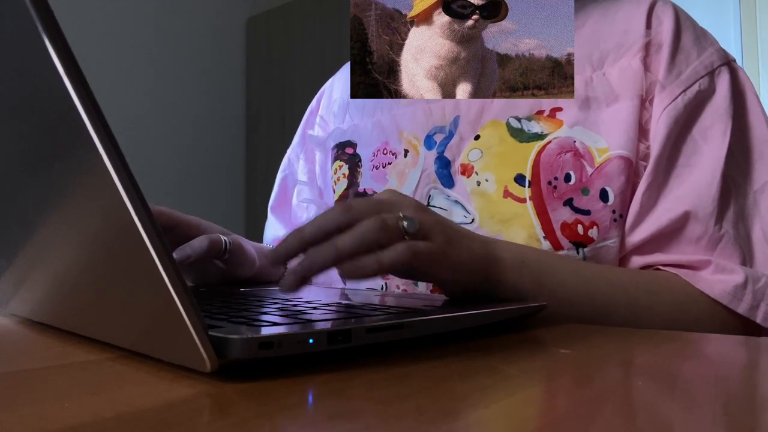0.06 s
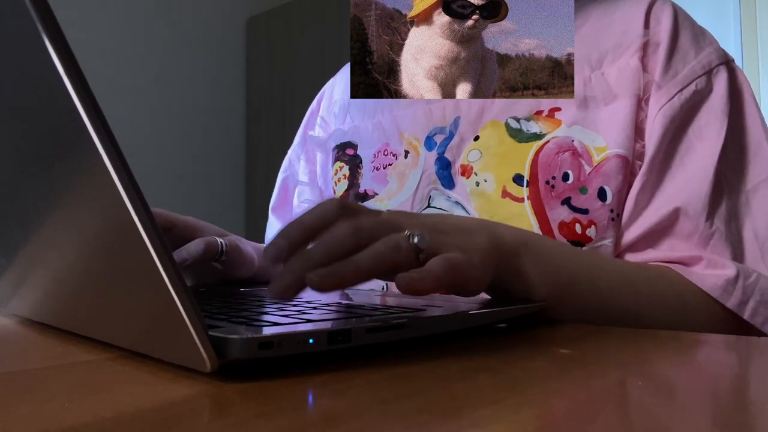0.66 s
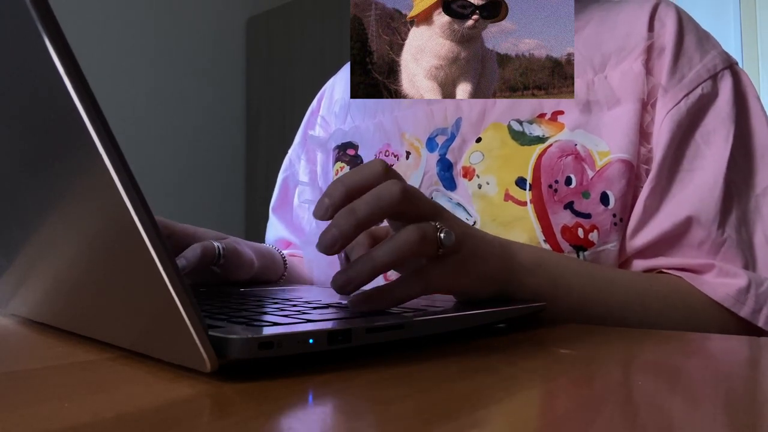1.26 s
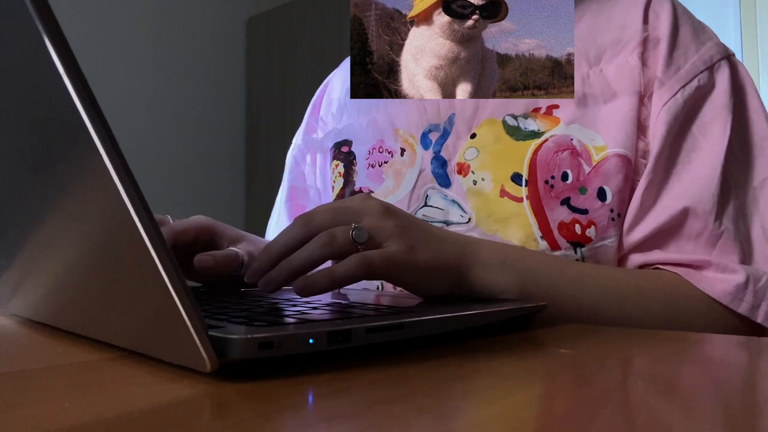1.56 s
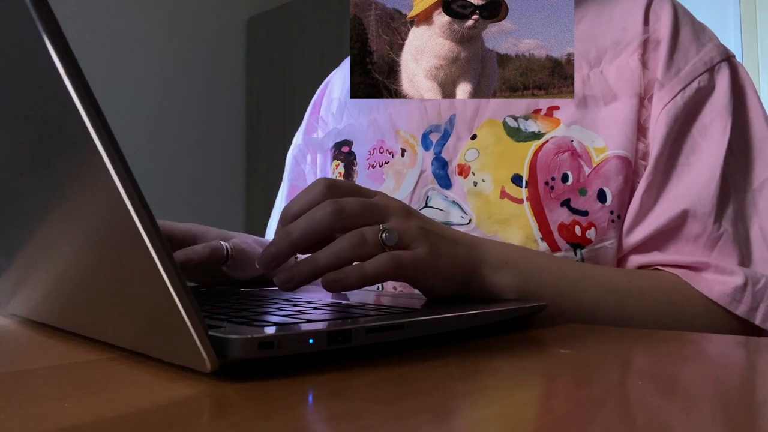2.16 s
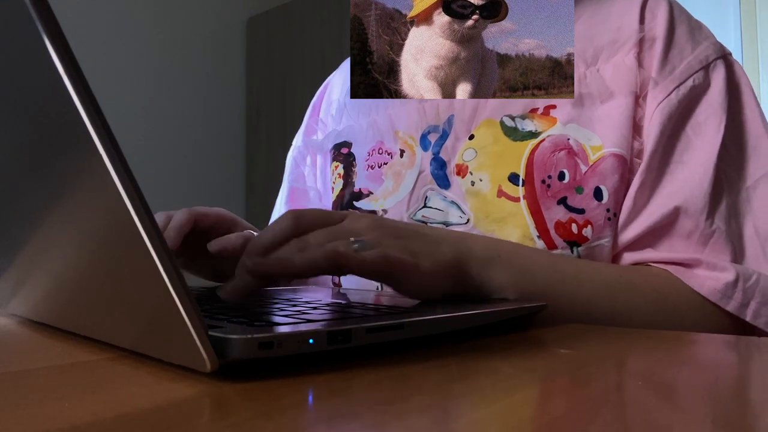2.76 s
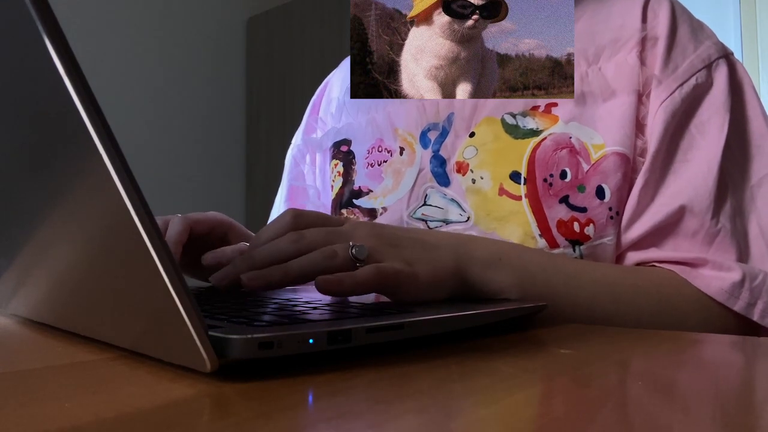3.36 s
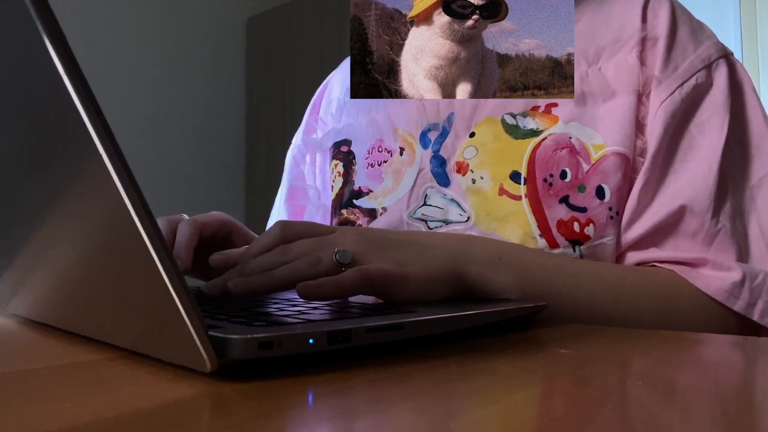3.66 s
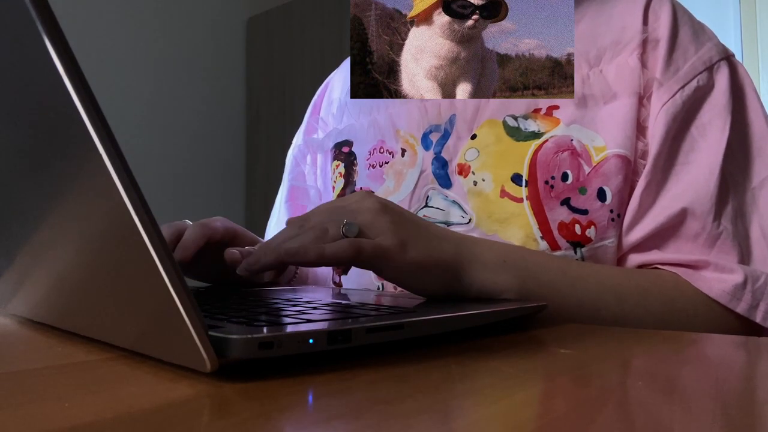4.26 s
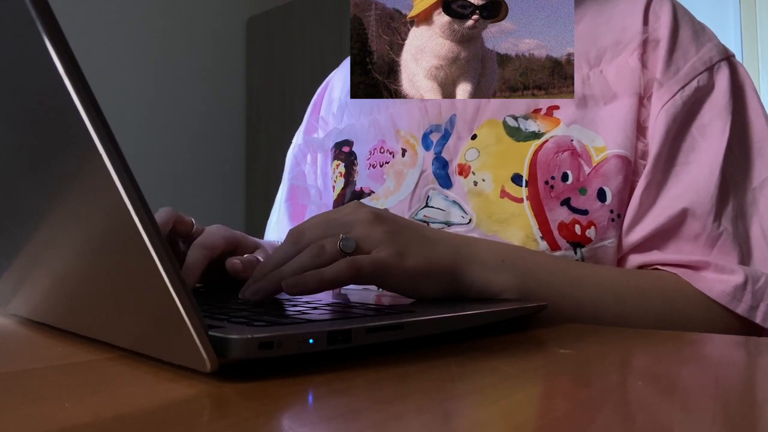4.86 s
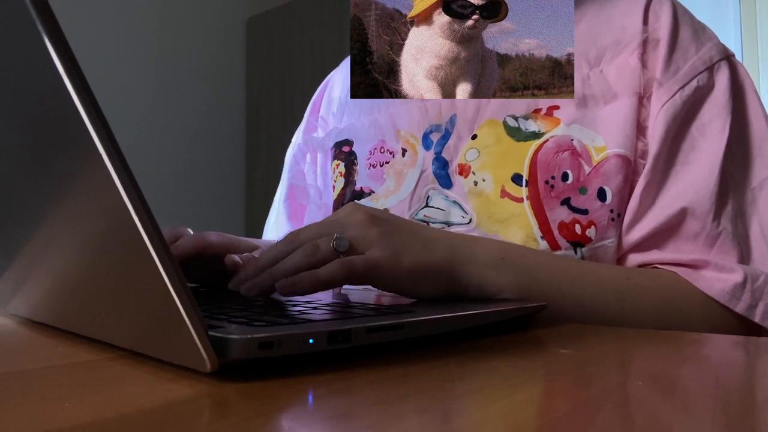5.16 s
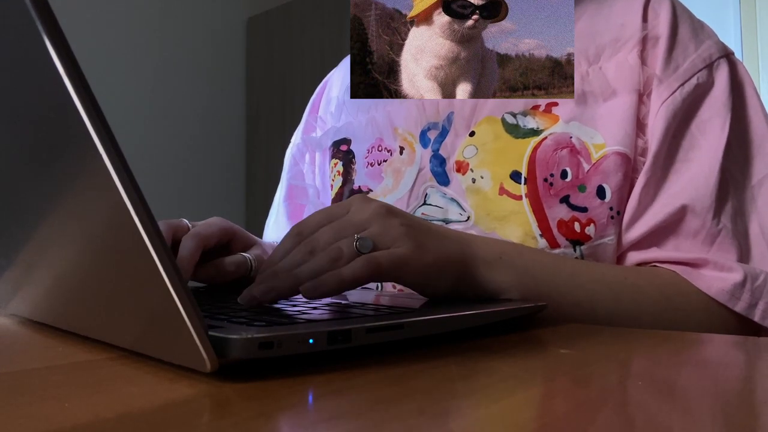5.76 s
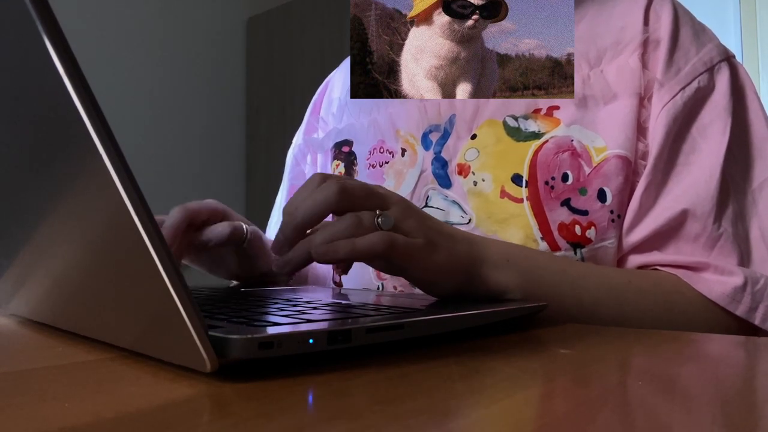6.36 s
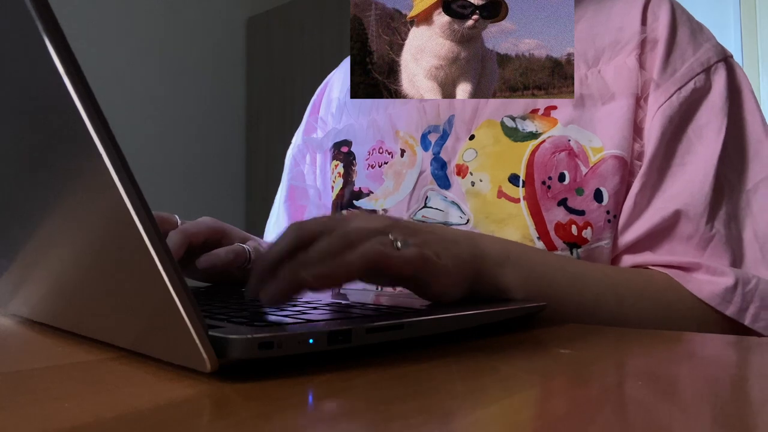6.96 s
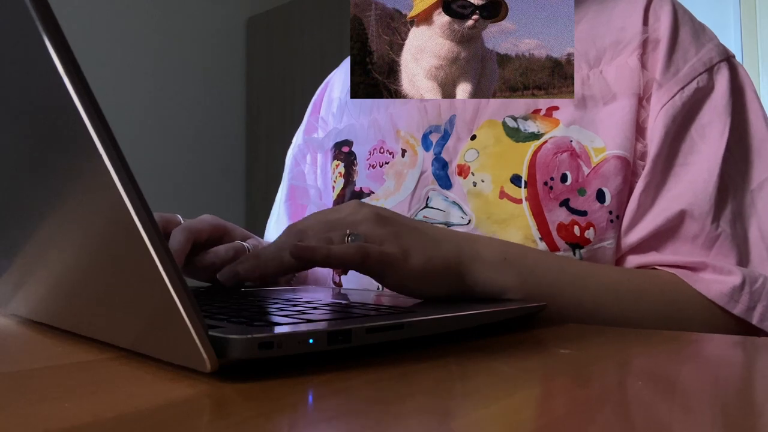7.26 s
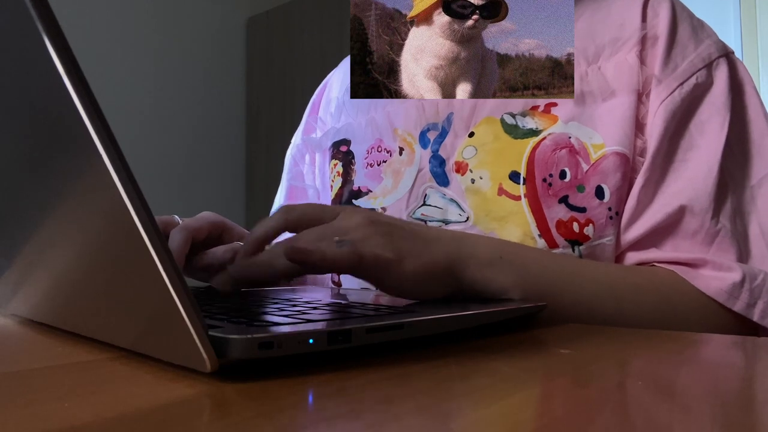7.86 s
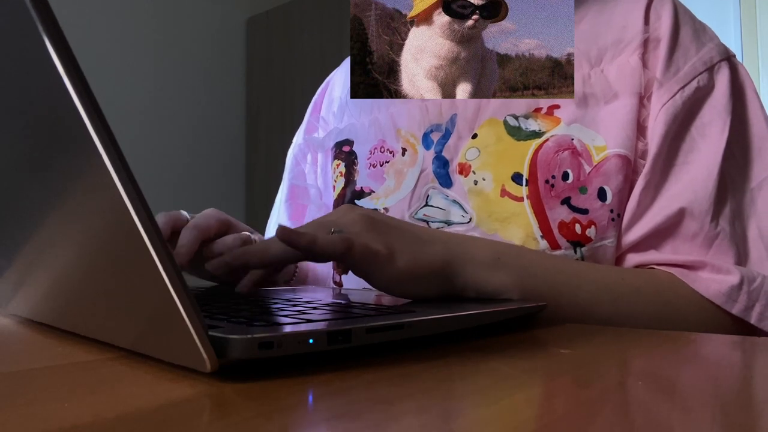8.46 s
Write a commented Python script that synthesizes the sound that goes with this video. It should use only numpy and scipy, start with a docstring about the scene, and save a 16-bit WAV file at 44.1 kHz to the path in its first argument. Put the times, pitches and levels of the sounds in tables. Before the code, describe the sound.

Someone types on a laptop standing on a wooden desk. A few scattered keystrokes come first, then quick, uneven flurries with brief pauses, growing busier toward the end. Each press is a crisp plastic click with a small knock from the case and a soft thump from the desk. Hands rub faintly on the palm rest. The sound is close, in a small, quiet room with a low hum.

```python
"""Someone types in short flurries on a laptop that stands on a wooden desk in a small, quiet room.
Every press is one chain: the nail clicks on the plastic cap, the key bottoms out and rings the case, and the desk swings under it.
Keys tick as they spring back, hands shift on the palm rest between words; a low hum and a faint whine lie behind."""
import sys
import numpy as np
from scipy import signal
from scipy.fft import rfft, irfft
from scipy.io import wavfile

SR = 44100
rng = np.random.default_rng(int(sys.argv[2]) if len(sys.argv) > 2 else 0)


def output_pcm(signal):
    """Save a mono or channel-first signal as 16-bit PCM at the path in sys.argv[1].

    Samples are clipped to [-1, 1] before scaling.
    """
    pcm = np.clip(np.atleast_2d(signal).T, -1, 1) * 32767
    wavfile.write(sys.argv[1], SR, np.round(pcm).astype(np.int16))


N = 374850

# modes of the laptop case: (Hz, dB, t60 s)
CASE = [(155.1, -3, 0.43), (232.5, 3, 0.32), (287.7, -4, 0.35), (345, 3, 0.071), (397.6, -5, 0.19), (425.4, -6, 0.31), (470, -2, 0.28), (510.7, 0, 0.12), (611, -6.5, 0.11), (702, -1.5, 0.15), (946, 0, 0.37), (1042, 14.5, 0.2), (1134, 11.5, 0.1), (1311, 7.5, 0.27), (1522, -6.5, 0.15), (1636, -10.5, 0.23), (2000, -31, 0.09), (2210, -30, 0.27)]
# palms rubbing on the case, deep under the heel of the hand and brighter in a fast slide: (start s, end s, dB, lower edge Hz, upper edge Hz)
SHIFTS = [(0, 0.128, -51.5, 108, 235), (1.12, 1.42, -60.5, 60, 170), (1.224, 1.42, -56, 168, 386), (1.332, 1.41, -50, 245, 337),
          (3.379, 3.676, -63.5, 122, 395), (4.897, 5.08, -63, 119, 388), (6.43, 6.56, -50, 134, 570), (6.51, 6.657, -49.5, 113, 202),
          (6.735, 6.84, -57.5, 151.9, 394), (7.059, 7.257, -55.5, 121, 247.9)]
# fingertips brushing over the caps: (start s, end s, dB)
BRUSHES = [(0.47, 0.618, -80.5), (0.743, 0.86, -80), (4.967, 5.053, -93), (5.121, 5.282, -75), (6.305, 6.475, -76.5), (6.467, 6.62, -88), (7.141, 7.23, -74), (7.587, 7.656, -72.5), (8.106, 8.23, -72)]
# still room air: (Hz, dB per Hz)
AIR = [(25, -40), (50, -11.5), (75, 0.5), (105, -1.5), (150, -2.5), (190, -10.5), (300, -12.5), (450, -17.5), (800, -26.5), (1300, -34.5), (2000, -39), (5000, -45.5), (13000, -48), (16000, -53.5)]
AIR_DB = -63
# steady hum and whine: (Hz, dB)
HUM = [(107.7, -72.5), (150.7, -77)]
WHINE = [(382, -94), (872, -89), (1077, -90.5), (1282, -85.5)]
# the room's answer by band: (low Hz, high Hz, dB against the direct sound, t60 s)
ROOM = [(125.6, 417, -5.5, 0.33), (399, 1124, -1, 0.31), (920, 2480, -2.5, 0.23), (2870, 8500, -5, 0.23), (8200, 15900, -5.5, 0.23)]
TOP_HZ = 15900  # fixed
TIME = np.arange(N) / SR
LEAD_S = .012  # fixed
AGE = np.arange(-int(LEAD_S * SR), SR // 3) / SR  # fixed
SNAP_S, KNOCK_S = .006, .017  # fixed
HUM_WAVER_DB = 6.5  # fixed
# key presses, one flurry to a paragraph: (s, snap of the nail dB, clack of the cap dB, cap pitch Hz, blow on the case dB, weight on the desk dB)
PRESSES = [
    (0.001, -70.5, -59, 944, -53.5, -39.5), (0.051, -65.5, -52.5, 1000, -53.5, -45),

    (0.5869, -49.5, -44.5, 1234, -49, -48.5), (0.648, -50.5, -49.5, 990, -49.5, -58),

    (1.4789, -65, -58.5, 1236, -62.5, -59), (1.5709, -62.5, -66, 880, -60, -58),

    (2.306, -74, -70, 2320, -54.5, -49), (2.369, -74, -63, 920, -53, -52), (2.507, -86, -70.5, 1000, -56.5, -63), (2.594, -50, -51, 1900, -46.5, -40.5),
    (2.636, -56, -55.5, 1600, -43.5, -49), (2.7193, -52.5, -42.5, 994, -40.5, -36.5), (2.753, -72, -53.5, 1550, -46.5, -61),
    (2.826, -82, -56, 2530, -48, -43), (2.872, -84, -51.5, 1028, -47, -51),

    (3.369, -92, -76.5, 1800, -63, -50), (3.436, -79, -72.5, 1290, -59.5, -52), (3.4939, -80, -63.5, 1400, -53.5, -48.5), (3.561, -79, -71, 1300, -61, -50.5),

    (3.816, -80, -65.5, 860, -52.5, -45), (3.8905, -63, -54, 1310, -51, -42.5), (3.983, -74, -66, 1300, -57, -48.5),
    (4.0237, -69, -57, 2540, -44, -38), (4.075, -63.5, -59, 1052, -47.5, -44), (4.1852, -48, -52, 1090, -44, -33.5),
    (4.4621, -66, -78, 930, -70, -50),

    (4.804, -86, -74.5, 1110, -53, -46), (4.8747, -75, -66.5, 1105, -51.5, -47.5), (4.988, -74, -64, 1290, -67, -46.5),
    (5.087, -71, -69, 1300, -55.5, -40), (5.1341, -56.5, -69.5, 1320, -54.5, -38), (5.1977, -58, -58.5, 1370, -50.5, -42),
    (5.2376, -67, -56, 2140, -62, -44.5),

    (5.7658, -78, -65, 2400, -49, -41.5), (5.8154, -64, -66.5, 1310, -51.5, -44),

    (6.122, -77, -57.5, 2500, -50.5, -38.5), (6.1866, -77, -54.5, 906, -45.5, -46), (6.2454, -69, -68.5, 2120, -57.5, -44),
    (6.3114, -70.5, -71, 1060, -51.5, -53), (6.398, -65, -67, 940, -52, -46.5), (6.440, -69, -60.5, 850, -47, -46),
    (6.5859, -67, -58, 920, -57, -40.5), (6.6251, -55, -50.5, 1640, -45.5, -47.5), (6.6898, -49, -52.5, 1690, -41, -37),
    (6.7205, -50.5, -55, 2530, -44, -44),

    (6.8806, -45, -39.5, 1500, -49.5, -44.5), (6.9629, -59, -49, 915.3, -50, -54), (7.054, -64.5, -51, 960, -45, -35.5),
    (7.109, -58, -57, 1380, -48, -42.5), (7.1537, -51.5, -65, 990, -49, -36.5), (7.2107, -56, -59.5, 1080, -49, -45),

    (7.522, -80, -65.5, 1060, -56.5, -42), (7.598, -66, -61.5, 1050, -50.5, -38), (7.6984, -61, -63, 2500, -68.5, -47), (7.7828, -79, -62, 1070, -51, -48.5),
    (7.8459, -72.5, -56, 1055, -58.5, -50), (7.9157, -64.5, -58, 1472, -66, -45), (8.0028, -52.5, -52, 2480, -52, -35),
    (8.0643, -57.5, -54, 1062, -51.5, -41), (8.139, -62, -68, 1040, -50, -37.5), (8.1761, -56, -57, 1027, -46, -47),

    (8.3583, -57, -51.5, 960, -49, -43.5), (8.4181, -63.5, -56, 1090, -48, -46), (8.463, -73, -62, 990, -51, -42.5)]
# light ticks of a key springing back or a nail touching a cap: (s, snap dB, clack dB, cap pitch Hz)
TICKS = [(0.4896, -70, -64, 1630), (0.5832, -51.5, -72, 1240), (1.26, -67.5, -83, 1130), (2.1721, -72.5, -69.5, 1270), (2.2447, -76, -75.5, 2300),
         (2.2913, -64.5, -65, 2600), (2.3796, -56.5, -63, 940), (2.816, -67.5, -75, 1500), (2.888, -68, -82, 1040), (3.883, -83, -54.5, 1240),
         (3.911, -74, -58, 1300), (4.0125, -62.5, -71, 2493), (4.0908, -68, -66, 1039), (4.216, -55, -56, 1406), (4.725, -78, -78.5, 2500),
         (4.778, -79.5, -76, 2500), (4.911, -79, -60, 1410), (4.973, -61.5, -63.5, 1420), (5.008, -65, -82, 1300), (5.073, -70, -70, 2500),
         (5.3418, -72, -72, 1080), (6.111, -70.5, -65, 2500), (6.49, -67.5, -56.5, 1000), (6.5465, -75, -60, 1010), (7.099, -63, -58, 948.6),
         (7.415, -70.5, -66.5, 1035), (7.5336, -77.5, -66, 1030), (7.6109, -70, -60, 860), (7.7563, -66.5, -67.5, 880), (8.1284, -63.5, -70, 850),
         (8.161, -66, -69, 1050)]
# the hinge's tick lies between the nail's snap and the cap's clack (the snap's share 0-1, dB)
TICK_SHARE, TICK_DB = 0.56, -4.5
# the deck's knock follows the clack and, by a share, the blow on the case (share 0-1, dB)
KNOCK_SHARE, KNOCK_DB = 0.14, 0
# after the click the key bottoms out, then the desk gives (s)
TRAVEL_S, DESK_LAG_S = 0.00248, 0.0033
# pitches differ with the place of the key: (typical Hz, scatter in octaves)
DECK_LOW_HZ, DECK_LOW_SCATTER = 276.8, .19
DECK_HIGH_HZ, DECK_HIGH_SCATTER = 564, 0.19
DESK_HZ, DESK_SCATTER = 87.7, 0.077
# keys lie across the stereo picture (left minus right dB)
KEYS_PAN_DB, KEYS_PAN_SCATTER_DB = 0.3, 2
# a struck cap clatters in its frame: level against its clack (dB), time it takes (s), drop over that time (dB)
CLATTER_DB, CLATTER_S, CLATTER_DROP_DB = -6.5, .055, 8.5
CAP_HZ = None
CAP_SCATTER = None
SCUFF_OCTAVES = None
SCUFF_DB = None


def undb(db):
    """Decibels to gain."""
    return 10 ** (np.asarray(db) / 20)


def unit(x):
    """Scale to rms 1."""
    return x / np.sqrt(np.mean(x ** 2))


def pan(db):
    """Left and right gains for a level difference."""
    gains = undb(np.array([[db], [-db]]) / 2)
    return unit(gains)


def band(x, lo_hz, hi_hz, order=3):
    """Causal band-pass."""
    return signal.sosfilt(signal.butter(order, [lo_hz, min(hi_hz, SR / 2 - 100)], "band", fs=SR, output="sos"), x)


def pair(size, apart):
    """Stereo noise; apart is the side's amplitude against the mid's."""
    mid, side = rng.standard_normal((2, size))
    return unit(np.array([mid + apart * side, mid - apart * side]))


def walk(rate):
    """Slow random wander, spread near 1."""
    knots = rng.standard_normal(int(rate * N / SR) + 2)
    return np.interp(TIME * rate, np.arange(len(knots)), knots)


def fade(t60):
    """Free decay from the moment of contact, running out smoothly."""
    return (AGE >= 0) * np.exp(-np.log(1000) * np.abs(AGE) / t60) * np.cos(np.pi / 2 * (AGE / AGE[-1]) ** 2)


def onset_level(x, span):
    """Scale a blow to rms 1 over its first span seconds."""
    return x / np.sqrt(np.mean(np.sum(x[:, AGE < span] ** 2, axis=1)) / (span * SR))


def add(out, s, x):
    """Mix a sound into out from time s on."""
    start = int(round(s * SR))
    a, b = max(start, 0), min(start + x.shape[1], N)
    out[:, a:b] += x[:, a - start:b - start]


def case_ring(lo_hz, hi_hz, spread):
    """The case's modes in a band; each key drives them with its own strength and sign, and they reach the two sides out of step."""
    out = 0
    for hz, db, t60 in CASE:
        if lo_hz <= hz < hi_hz:
            size, detune, skew, side = rng.standard_normal(4)
            phase = 2 * np.pi * hz * (1 + 0.0033 * detune) * AGE + spread * skew * np.array([[1], [-1]])
            out = out + np.sign(side) * undb(db + 1.45 * size) * fade(t60) * np.sin(phase)
    return out


def crack(lo_hz, hi_hz, t60, apart, graze_db):
    """A plastic contact: the finger grazes the cap for a moment, then it snaps and dies quickly."""
    graze = undb(graze_db) * (AGE < 0) * np.exp(-np.abs(AGE) / 0.0027)
    return band(pair(len(AGE), apart) * (fade(t60) + graze + 1e-9), lo_hz, hi_hz)


def key_caps(landing_db=-11, rattle_db=-13):
    """The finger lands a few milliseconds before each click; afterwards the hinge rattles and the loose cap clatters."""
    out = np.zeros((2, N))
    for s, snap_db, clack_db, hz, *_ in PRESSES + TICKS:
        tick_db = TICK_DB + TICK_SHARE * snap_db + (1 - TICK_SHARE) * clack_db
        place = pan(KEYS_PAN_DB + KEYS_PAN_SCATTER_DB * rng.standard_normal())
        add(out, s - LEAD_S, key_click(snap_db, tick_db, clack_db, hz) * place)
        landing = onset_level(crack(910, 6900, t60=0.017, apart=1.0, graze_db=-18), SNAP_S)
        add(out, s - LEAD_S - .003 - 0.0037 * rng.random(), undb(tick_db + landing_db) * landing)
        for when, size in rng.random(size=(2, 2)):
            rattle = onset_level(crack(2000, 12000, t60=0.0089, apart=0.67, graze_db=-34), SNAP_S)
            add(out, s - LEAD_S + .003 + .028 * when ** 2, undb(tick_db + rattle_db + 2.8 * size) * rattle)
        for when in rng.random(size=2):
            clatter = onset_level(crack(620, 1790, t60=0.014, apart=0.97, graze_db=-13), SNAP_S)
            add(out, s - LEAD_S + CLATTER_S * when, undb(clack_db + CLATTER_DB - CLATTER_DROP_DB * when) * clatter)
    return out


def key_strokes():
    """A key hits the end of its travel: the deck under it knocks at two pitches and the case's low modes ring on."""
    out = np.zeros((2, N))
    for s, _, clack_db, _, body_db, _ in PRESSES:
        knock_db = KNOCK_DB + KNOCK_SHARE * body_db + (1 - KNOCK_SHARE) * clack_db
        body = undb(0.0) * onset_level(own_note(scattered(DECK_LOW_HZ, DECK_LOW_SCATTER), t60=0.057, spread=0.25), KNOCK_S)
        body += undb(-7.5) * onset_level(crack(135, 442, t60=0.07, apart=0.32, graze_db=-23), KNOCK_S)
        body += undb(-2) * onset_level(case_ring(100, 440, spread=0.63), KNOCK_S)
        knock = undb(-6) * onset_level(own_note(scattered(DECK_HIGH_HZ, DECK_HIGH_SCATTER), t60=0.034, spread=0.45), KNOCK_S)
        knock += undb(-4.5) * onset_level(crack(374, 725, t60=0.028, apart=0.9, graze_db=-15.5), KNOCK_S)
        knock += undb(-12.5) * onset_level(case_ring(440, 800, spread=0.45), KNOCK_S)
        add(out, s + TRAVEL_S - LEAD_S, undb(body_db) * body + undb(knock_db) * knock)
    return out


def desk(swell_s=0.025, shape=2.47, overtone_hz=150, overtone_db=-14.5):
    """The laptop rocks on its feet and the desk top swings for a few cycles, mostly to the right; each press lasts differently."""
    out = np.zeros((2, N))
    for s, *_, db in PRESSES:
        hz = scattered(DESK_HZ, DESK_SCATTER)
        length, strength, skew = rng.standard_normal(3)
        age = np.maximum(AGE, 0) / (swell_s * np.exp(0.12 * length))
        swing = (age * np.exp(1 - age)) ** shape
        overtone = undb(overtone_db + 3.5 * strength) * np.sin(2 * np.pi * overtone_hz * AGE + 0.64 * skew * np.array([[1], [-1]]))
        add(out, s + DESK_LAG_S - LEAD_S, undb(db) * swing * (undb(1.5) * np.sin(2 * np.pi * hz * AGE) * pan(-8.0) + overtone * pan(-15.5)))
    return band(out, 40, 900, order=2)  # the desk top radiates little below its own note


def hands():
    """Skin sticks and slips on the case; fingertips hiss lightly over the caps."""
    out = np.zeros((2, N))
    for start, end, db, lo_hz, hi_hz in SHIFTS:
        size = max(int((end - start) * SR), 100)
        slips = (rng.random(size) < 1100 / SR) * pair(size, 0.5) * signal.windows.tukey(size, .4)
        rub = band(np.pad(slips, ((0, 0), (0, len(AGE)))), lo_hz, hi_hz, order=4)  # the case rings on after the last slip
        add(out, start, undb(db) * rub / np.std(rub[:, :size]) * pan(-2.6))
    for start, end, db in BRUSHES:
        size = max(int((end - start) * SR), 100)
        grains = pair(size, 0.43) * undb(7.1 * rng.standard_normal(size))
        add(out, start, undb(db) * unit(band(grains * np.hanning(size), 4500, 21000, order=1)))
    return out


def room(x):
    """Desk, screen and near walls return a dense, short tail, alike on both sides in the bass and top treble."""
    age = np.arange(SR // 2) / SR
    tail = 0
    for lo_hz, hi_hz, db, t60 in ROOM:
        apart = np.interp(lo_hz, [130, 900, 2800, 8000], [0.17, 1, 1.0, 0.059])
        echoes = pair(len(age), apart) * np.exp(-np.log(1000) * age / t60) * (1 - np.exp(-age / 0.0014))
        tail = tail + undb(db) * band(unit(echoes), lo_hz, hi_hz) / np.sqrt(len(age))
    return signal.fftconvolve(x, tail, axes=1)[:, :N]


def background():
    """Room air with a wavering hum; a thin whine sets in, and a faint tone passes once."""
    hz, db = np.transpose(AIR)
    bins = np.fft.rfftfreq(N, 1 / SR) + 1
    colour = undb(np.interp(np.log(bins), np.log(hz), db))
    apart = np.interp(np.log(bins), np.log([100, 1000, 5000, 11000]), [0.34, 1.0, 1.0, 0.23])
    mid, side = rfft(rng.standard_normal((2, N))) * colour
    air = undb(AIR_DB + 1.0 * walk(9.6)) * unit(irfft([mid + apart * side, mid - apart * side], N)) * pan(-0.87)
    hum = sum(undb(db + HUM_WAVER_DB * walk(7.1)) * np.sin(2 * np.pi * hz * TIME + walk(7.8)) for hz, db in HUM)
    whine = sum(undb(db + 2 * walk(14)) * np.sin(2 * np.pi * hz * TIME + 0.73 * walk(41)) for hz, db in WHINE)
    tone = np.interp(TIME, [2.75, 2.85, 3.15, 3.4], [0, 0.83, 0.64, 0.18]) * undb(-78.5 + 4.6 * walk(22)) * np.sin(2 * np.pi * 1495 * TIME + 2 * walk(55))
    return air + np.sqrt(2) * (hum * pan(-14.5) + whine * (TIME > 1.45) * pan(7.9)) + tone


def own_note(hz, t60, spread):
    """One damped resonance, heard a little out of step on the two sides."""
    skew = spread * rng.choice([-1, 1]) * np.array([[1], [-1]])
    return fade(t60) * (1 - np.exp(-np.abs(AGE) * hz * 2)) * np.sin(2 * np.pi * hz * AGE + skew)


def key_click(snap_db, tick_db, clack_db, hz):
    """A bright snap, a tick of the hinge, and a dry clack of the cap that rings the case's upper modes."""
    tilt_db, lean_db = 1.0 * rng.standard_normal(2)  # no two caps are hit on the same spot
    snap = undb(tilt_db) * crack(7540, 12300, t60=0.012, apart=0.39, graze_db=-10.5)
    snap += undb(-tilt_db + 1.0) * crack(11400, 15350, t60=0.0087, apart=0.14, graze_db=-13)
    tick = undb(lean_db - 2.0) * crack(2670, 6100, t60=0.014, apart=1.0, graze_db=-6.0)
    tick += undb(-lean_db) * crack(5650, 7330, t60=0.015, apart=0.47, graze_db=-19)
    # every hinge has a short note of its own
    tick = onset_level(tick, SNAP_S) + undb(-4) * onset_level(own_note(rng.uniform(3016, 7576), t60=0.025, spread=0.98), SNAP_S)
    clack = undb(-4.5) * onset_level(crack(0.64 * hz, 1.79 * hz, t60=0.017, apart=1.07, graze_db=-11.5), SNAP_S)
    clack += undb(-4.0) * onset_level(own_note(hz, t60=35 / hz, spread=0.72), SNAP_S)
    lowest_hz = min(0.85 * hz, 1450)  # a cap drives the modes from about its own pitch upwards
    clack += undb(-12) * onset_level(case_ring(lowest_hz, 3000, spread=0.89), SNAP_S) * pan(0.83)
    return undb(snap_db) * onset_level(snap, SNAP_S) + undb(tick_db) * onset_level(tick, SNAP_S) + undb(clack_db) * clack


def scattered(hz, octaves):
    """The pitch of one key, somewhere around the typical one."""
    return hz * 2 ** (octaves * np.clip(rng.standard_normal(), -2, 2))


def scene():
    """Keys, desk and hands in the room; the whole sound dips briefly once."""
    typing = key_caps() + key_strokes() + desk() + hands()
    dip_db = np.interp(TIME, [1.415, 1.431, 1.441, 1.456], [0, -20, -20, 0])  # fixed
    return (typing + room(typing) + background()) * undb(dip_db)


def record(dry):
    """The recorder cuts the very top."""
    return signal.sosfilt(signal.ellip(8, .2, 70, TOP_HZ, fs=SR, output="sos"), dry)


dry = scene()
out = record(dry)
output_pcm(out)
```